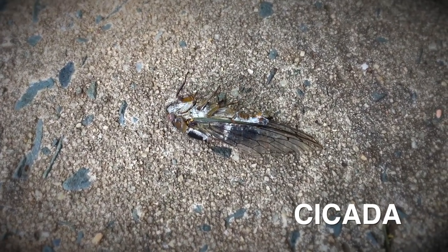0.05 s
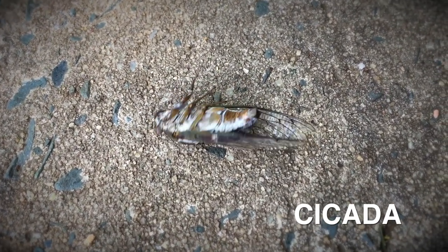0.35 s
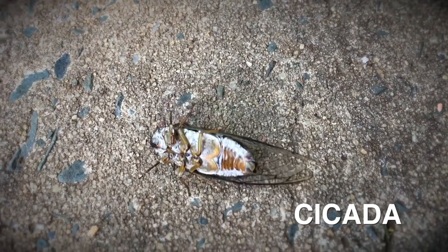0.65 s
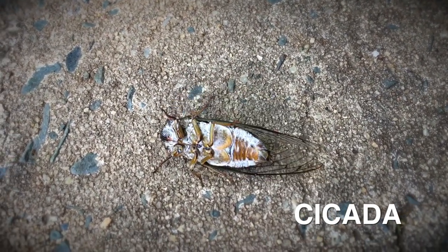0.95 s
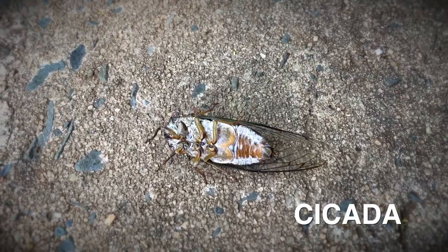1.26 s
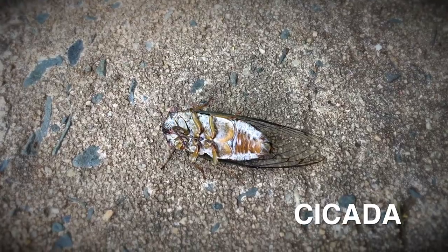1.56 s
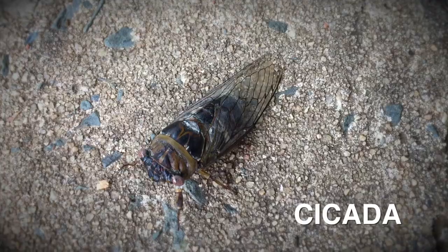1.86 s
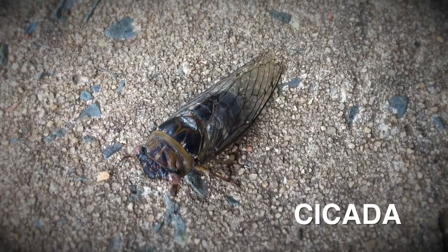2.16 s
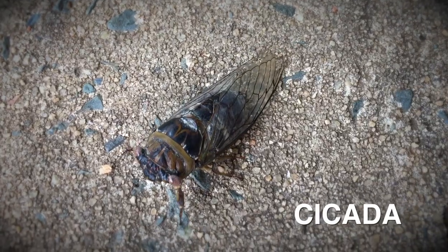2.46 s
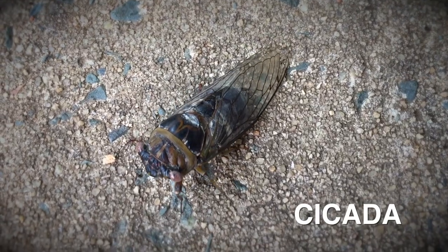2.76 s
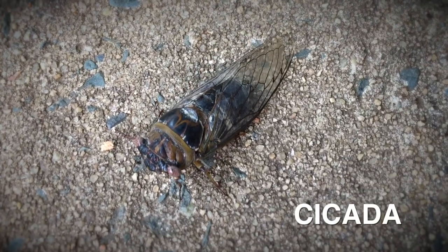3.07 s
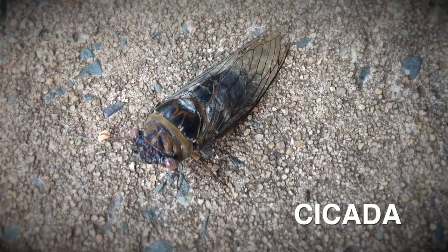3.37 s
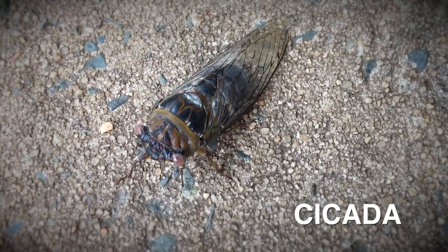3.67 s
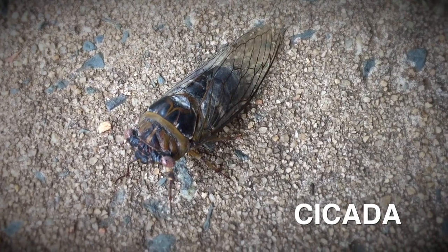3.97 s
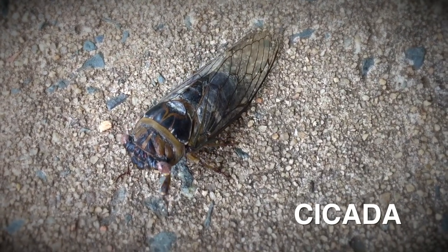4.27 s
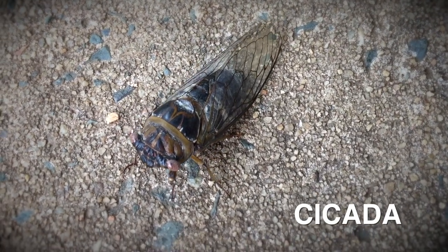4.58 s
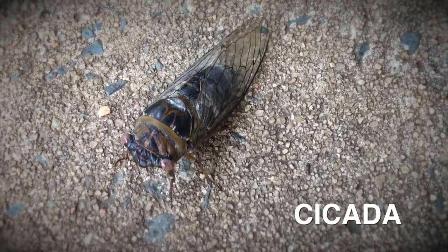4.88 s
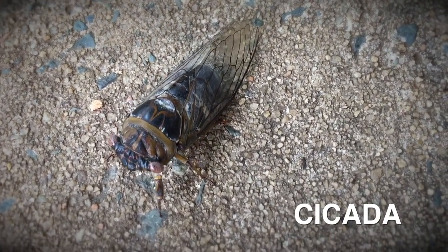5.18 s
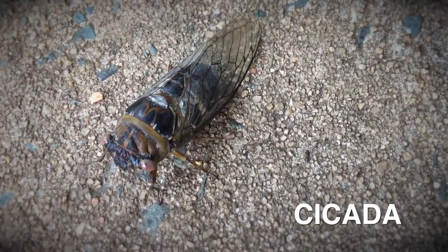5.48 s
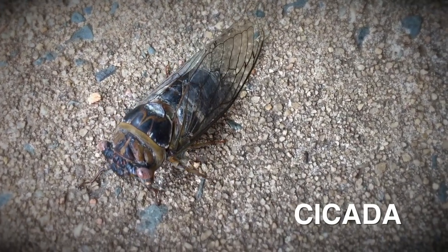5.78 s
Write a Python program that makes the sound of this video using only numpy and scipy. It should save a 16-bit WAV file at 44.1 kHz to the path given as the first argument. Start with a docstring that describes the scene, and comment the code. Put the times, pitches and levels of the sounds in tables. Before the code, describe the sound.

A cicada buzzes loudly on a concrete patio, close to the microphone, with a fast, shrill rattle that wavers and shifts tone as it rolls over. A distant engine hums faintly underneath and fades. After about two seconds the buzz stops abruptly. The rest is quiet: a few tiny claw ticks on the concrete over a far insect chorus, low rumble and soft outdoor hiss.

```python
"""On a concrete patio, a cicada buzzes up close, rolls from its side onto its back, tips back onto its side and
falls silent. Its two tymbals buckle in turn, three ribs a stroke, and each rib sets the hollow abdomen ringing.
Then its claws tick on the concrete. Behind it are a far insect chorus, low rumble and soft outdoor hiss; a
distant engine fades out early, and faint high whistles come and go near the end."""
import sys
import numpy as np
from scipy import signal
from scipy.fft import rfft, irfft, next_fast_len
from scipy.io import wavfile

SR = 44100
rng = np.random.default_rng(int(sys.argv[2]) if len(sys.argv) > 2 else 0)


def dump(signal):
    """Clip the signal to [-1, 1] and save it as 16-bit WAV at the path in sys.argv[1]."""
    limited = np.clip(np.atleast_2d(signal).T, -1, 1)
    pcm = np.round(limited * 32767).astype(np.int16)
    wavfile.write(sys.argv[1], SR, pcm)


N = 257103
T = np.arange(N) / SR

RISE_AT_S, RISE_S = 1.85, 0.12   # the background comes up as the buzz stops
CHORUS_FALL_DB_PER_S = 0.5


def cicada(roll_at_s=0.52, side_again_at_s=1.8, gain_db=-11.5, sway_db=0.66):
    """The buzz wavers with the insect's effort and changes colour as the body rolls onto its back and then back
    onto its side."""
    # Tone with one tymbal against the ground. Each row: centre in Hz, width in Hz, gain in dB.
    on_side = [(4350, 3600, -5), (5090, 280, -5.5), (6240, 760, 2.5), (9460, 1700, 6), (14000, 6100, -5)]
    # Tone while the body tips over. Each row: centre in Hz, width in Hz, gain in dB.
    tipping_colour = [(4550, 700, -4), (5030, 180, 14), (6200, 870, -6)]
    on_back = ramp(roll_at_s, 0.057) - ramp(side_again_at_s, 0.019)
    tipping = np.exp(-((T - 0.526) / 0.042) ** 2)   # a brief moment around the roll
    buzz = tymbal_buzz(on_back)
    buzz = (1 - tipping) * buzz + tipping * colour(buzz, tipping_colour)
    buzz = on_back * buzz + (1 - on_back) * colour(buzz, on_side)
    posture_db = 0.3 * on_back - 0.6 * tipping
    return from_db(gain_db + posture_db + sway_db * drift(7.4)) * buzz


def tymbal_buzz(on_back, snap_db=-18, shrill_db=-10, muffled_db=-10, fizz_db=-23, fizz_t60=0.035):
    """Two tymbals take turns ringing abdomen, shell and membrane; so small a body radiates no bass."""
    # Muscle pace. Each row: time in seconds, strokes per second of both tymbals together.
    beat = [(0.0, 103), (0.15, 109), (0.21, 98), (0.28, 101), (0.41, 119), (0.5, 99), (0.6, 101),
            (0.78, 89), (0.84, 93.3), (0.93, 84), (1.04, 94), (1.15, 100), (1.22, 89.7), (1.42, 104),
            (1.55, 91), (1.72, 107), (1.85, 88)]
    # One row per tymbal: when each of its three ribs buckles, in seconds into the stroke.
    rib_delays = [(0, .00242, .00493), (0, .0025, .00535)]
    # The ribs of each tymbal. Each row: pitch in Hz, ring length in seconds, then ring, snap and
    # shrill gains in dB.
    first_ribs = [(2307, 0.0023, 4, -1, -9.5), (2427, 0.00318, 7, 6, -19), (2555, 0.001, 8.5, 2, -5.5)]
    second_ribs = [(2547, 0.0026, 6.7, -5, -10), (2457, 0.003, 3.64, 2.5, -15),
                   (2660, 0.0015, 6.7, -3, -0.5)]
    # Modes of the shell and of the thin membrane. Each row: pitch in Hz, width in Hz, gain in dB.
    shell_modes = [(1306, 230, -9), (1507, 360, -8.5), (2940, 1200, -32), (4400, 1060, 6),
                   (4904, 210, -8.5), (5270, 117, -19), (7830, 730, -3.5)]
    membrane_modes = [(8745, 944, 7), (9740, 200, -10), (14600, 730, -33)]
    # Spectrum of the cuticle's fizz. Each row: frequency in Hz, relative level in dB.
    fizz_spectrum = [(4000, 8), (6500, -3), (9000, -3.5), (10500, -5), (12500, -0.5), (15500, -4.5)]
    # The body's narrow peaks and hollows. Each row: centre in Hz, width in Hz, gain in dB.
    body_colour = [(1080, 130, -10), (1530, 70, -6), (1660, 110, 3.5), (2440, 100, 2.5), (2680, 60, -1),
                   (2835, 100, 2.5), (2990, 100, -4), (3170, 170, 4.5), (3700, 120, -3), (3870, 100, 3),
                   (4010, 90, -3), (4265, 110, 3), (4740, 160, -3), (5280, 90, 2), (5480, 170, -4),
                   (6000, 300, -4), (8770, 170, 2), (15400, 700, -6)]
    strokes_per_s, = in_time(beat)
    hurry = 1 + 0.019 * drift(25)   # the muscles rush and lag at random
    cycles = np.cumsum(strokes_per_s / 2 * hurry) / SR
    offset_cycles = 0.53
    first_tone, first_snaps, first_kicks = tymbal(cycles - offset_cycles, rib_delays[0], first_ribs)
    second_tone, second_snaps, second_kicks = tymbal(cycles, rib_delays[1], second_ribs)
    shell = ring((first_snaps + second_snaps) * from_db(snap_db), shell_modes)
    # the tymbal that faces the ground loses its shrillness
    kicks = second_kicks + first_kicks * from_db(muffled_db * (1 - on_back))
    membrane = high_pass(ring(kicks * from_db(shrill_db), membrane_modes), hz=5800, order=2)
    # countless tiny modes of the cuticle smear every snap into a short fizz
    fizz_decay = from_db(fizz_db - 60 * T[:SR // 10] / fizz_t60)
    fizz = sum(signal.oaconvolve(snaps, fizz_decay * noise(fizz_spectrum)[:len(fizz_decay)])[:N]
               for snaps in (first_snaps, second_snaps))
    buzz = first_tone + second_tone + shell + membrane + fizz
    return high_pass(colour(buzz, body_colour), hz=1200, order=8)


def tymbal(cycles, delays, ribs, end_s=1.856, stroke_jitter_s=0.00055, rib_jitter_s=12e-6, uneven_db=0.7):
    """Each muscle pull buckles three ribs in a row, giving abdomen tone, snaps and membrane kicks."""
    pulls = np.interp(np.arange(100), cycles, T) + stroke_jitter_s * rng.standard_normal(100)
    pulls = pulls[pulls < end_s]
    tone, snaps, kicks = 0, 0, 0
    for delay, (hz, length, ring_db, snap_db, shrill_db) in zip(delays, ribs):
        late, force = rng.standard_normal((100, 2))[:len(pulls)].T
        buckles = clicks_at(pulls + delay + rib_jitter_s * late, from_db(uneven_db * force))
        tone = tone + from_db(ring_db) * signal.oaconvolve(buckles, abdomen(hz, length))[:N]
        snaps = snaps + from_db(snap_db) * buckles
        kicks = kicks + from_db(shrill_db) * buckles
    return tone, snaps, kicks


def abdomen(hz, length, damping=1.77):
    """The air sac's ring swells and dies within a few cycles as it trades energy with the tymbal."""
    t = np.arange(int(length * SR)) / SR
    return np.sin(2 * np.pi * hz * t) * np.sin(np.pi * t / length) * np.exp(-damping * t / length)


def claws(gain_db=-9, drag_s=0.009, bite_s=0.00038, slip_s=0.008, slip_db=-16, grit_db=4):
    """A claw drags over loose grains, bites, slips, catches again more weakly and scrapes on."""
    # Claws and wing catching on the concrete. Each row: time in seconds, relative level in dB,
    # seconds for the crackle to fall 60 dB, centre of its bright peak in Hz.
    ticks = [(1.888, -35.5, .012, 15000), (2.0158, -53, 0.017, 13000), (2.151, -46, 0.022, 14400),
             (2.732, -43, 0.016, 12500), (2.9118, -41.5, 0.0083, 9600), (2.9184, -49, .012, 11500),
             (2.9657, -48, .012, 12000), (2.9925, -39, .012, 13500), (3.4665, -56, .02, 13500),
             (3.535, -59, .012, 14000), (3.6531, -55, .015, 12000), (3.795, -59, .025, 10000),
             (4.3267, -34, 0.009, 13000), (4.592, -38, .012, 14000), (4.9212, -52, 0.014, 9500),
             (5.5044, -48, .01, 13000), (5.5248, -41.5, .012, 7000)]
    # Spectrum of the crackle. Each row: frequency in Hz, relative level in dB.
    crackle_spectrum = [(3000, -29), (6000, -12), (9000, -10.5), (12500, -4), (15500, -10)]
    softness = np.exp(-1 / (bite_s * SR))
    crackle = noise(crackle_spectrum)
    grit = from_db(grit_db * drift(400))
    out = shuffle() * crackle
    for at, db, t60, hz in ticks:
        drag = from_db(-23) * ramp(at - drag_s, drag_s)
        catch = dying(clicks_at(np.array([at, at + slip_s]), from_db([0, slip_db])), t60)
        scrape = dying(clicks_at(np.array([at]), from_db([-22])), t60=0.1)
        rub = np.where(T < at, drag, scrape) * grit
        force = signal.lfilter([1 - softness], [1, -softness], catch + rub)   # rounds the attack
        out = out + from_db(db) * colour(force * crackle, [(hz, 2000, 7.5)])
    return from_db(gain_db) * out


def shuffle(from_s=1.9, to_s=4.0, touches_per_s=3, gain_db=-64, spread_db=7):
    """The envelope of feet touching down lightly at random."""
    touches = (rng.random(N) < touches_per_s / SR) * (T > from_s) * (T < to_s)
    return dying(touches * from_db(gain_db + spread_db * rng.standard_normal(N)), t60=0.011)


def thin_high_ring(at_s=1.93):
    """A faint, thin, very high ring just after the buzz stops."""
    # The two ringing modes. Each row: pitch in Hz, width in Hz, gain in dB.
    modes = [(13930, 16, -72), (15350, 30, -73)]
    return ring(clicks_at(np.array([at_s]), [1]), modes)


def patio(x, scatter_db=-21, t60=0.05):
    """The ground and nearby things scatter a short, weak tail of dense reflections."""
    t = T[:SR // 8]
    tail = rng.standard_normal(len(t)) * from_db(-60 * t / t60)
    return x + from_db(scatter_db) * signal.oaconvolve(x, tail / np.linalg.norm(tail))[:N]


def engine(turns_per_s=37.7, start_db=-41.5, faint_db=-53, hold_s=0.68, fade_db_per_s=19.5):
    """A far engine drones on a few low orders, fades to a faint hum, then sinks away under the rumble."""
    # Engine orders. Each row: multiple of the turning rate, relative level in dB.
    orders = [(2, -1), (3, -5), (4, -1.5), (4.5, -14), (6, -16)]
    # Spectrum of the engine's noise. Each row: frequency in Hz, relative level in dB.
    roar_spectrum = [(30, 8), (70, -37), (200, 12), (300, -8), (600, -17), (1200, -9)]
    turns = np.cumsum(turns_per_s * (1 + 0.0077 * drift(2.48))) / SR
    drone = sum(from_db(db + 3 * drift(5.1)) * np.sin(2 * np.pi * (order * turns + rng.random()))
                for order, db in orders)
    roar = from_db(-11) * noise(roar_spectrum)
    level_db = np.maximum(start_db - fade_db_per_s * np.maximum(T - hold_s, 0), faint_db)
    return (rms_one(drone) + roar) * from_db(level_db) * (1 - ramp(start=1.73, length=0.38))


def surroundings(chorus_db=-49, rumble_db=-45, air_db=-60.5, rumble_fall_db_per_s=0.5):
    """Countless far insects merge into a sizzle over rumble and hiss; all sit lower during the buzz."""
    # Spectra of the three beds. Each row: frequency in Hz, relative level in dB.
    chorus_spectrum = [(1120, -54), (1900, -38), (1980, -28), (2110, -9), (2240, -5), (2600, -8.5),
                       (2790, 2), (2980, 0), (3280, -3.5), (3790, -6), (4850, -39.5), (5710, -34),
                       (6170, -48), (7850, -27.5), (9000, -73), (11700, -71), (19800, -120)]
    rumble_spectrum = [(13, -61.5), (22, -42), (41, -12), (65, 1), (91, -5.5), (119, -4), (141, -10),
                       (183, -10.5), (500, -41), (650, -78), (1100, -120)]
    air_spectrum = [(200, -1.5), (500, -7.5), (1000, 1), (1400, 0.5), (1900, -6), (4500, -16),
                    (9000, -26.5), (11000, -29), (16000, -27)]
    chorus = from_db(chorus_db - CHORUS_FALL_DB_PER_S * T + 0.6 * drift(28)) * noise(chorus_spectrum)
    rumble = from_db(rumble_db - rumble_fall_db_per_s * T + 0.9 * drift(7.8)) * noise(rumble_spectrum)
    air = from_db(air_db + 1.1 * drift(24)) * noise(air_spectrum)
    early = 1 - ramp(RISE_AT_S, RISE_S)
    return from_db(-3 * early) * (chorus + air) + from_db(-9 * early) * rumble


def singers():
    """Two warbling voices of the chorus, heard once the buzz stops."""
    # The two voices. Each row: pitch in Hz, level in dB before the slow fade.
    voices = [(2930, -59.5), (3040, -58)]
    song = sum(from_db(db - CHORUS_FALL_DB_PER_S * T) * wavering(hz, 70.46, rate=22, flutter_db=4.5)
               for hz, db in voices)
    return ramp(RISE_AT_S, RISE_S) * song


def whistles(hiss_db=-79):
    """Late on, thin, unsteady tones swell and fade over a faint high hiss."""
    # The whistles. Each row: start in seconds, length in seconds, pitch in Hz, level at the crest in dB.
    notes = [(3.65, 1.3, 5870, -76), (4.1, .7, 7050, -79), (4.3, 1.2, 6460, -83), (5.06, 0.13, 5500, -76),
             (5.2, 0.32, 6010, -76), (5.5, .6, 8570, -81), (5.58, .45, 6280, -79), (5.7, .12, 5500, -77)]
    # Spectrum of the hiss. Each row: frequency in Hz, relative level in dB.
    hiss_spectrum = [(4500, -22), (5800, -10), (8400, 0), (10000, -20)]
    out = from_db(hiss_db) * noise(hiss_spectrum) * ramp(start=3.3, length=0.64)
    for start, length, hz, db in notes:
        swell = from_db(db) * np.sin(np.pi * ramp(start, length))
        out = out + swell * wavering(hz, waver_hz=11.8, rate=20, flutter_db=2)
    return out


def wavering(hz, waver_hz, rate, flutter_db):
    """A tone of unit rms whose pitch and level wander."""
    turns = np.cumsum(hz + waver_hz * drift(rate)) / SR
    return rms_one(from_db(flutter_db * drift(rate)) * np.sin(2 * np.pi * turns))


def noise(spectrum):
    """Noise of unit rms, shaped by rows of Hz and dB."""
    hz, db = np.transpose(spectrum)
    size = next_fast_len(N)
    bins = np.maximum(np.fft.rfftfreq(size, 1 / SR), 1)
    gains = from_db(np.interp(np.log(bins), np.log(hz), db))
    return rms_one(irfft(rfft(rng.standard_normal(size)) * gains, size)[:N])


def drift(rate):
    """A random wander of spread 1 that changes about rate times a second."""
    size, points_per_s = 8192, 1024
    bins = np.fft.rfftfreq(size, 1 / points_per_s)
    slow = irfft(rfft(rng.standard_normal(size)) / (1 + (bins / rate) ** 2))
    return np.interp(T * points_per_s, np.arange(size), rms_one(slow))


def ring(clicks, modes):
    """Clicks set damped sines ringing, with signs alternating from mode to mode."""
    out = 0
    for k, (hz, width, db) in enumerate(modes):
        r, w = np.exp(-np.pi * width / SR), 2 * np.pi * hz / SR
        mode = signal.lfilter([np.sin(w), 0], [1, -2 * r * np.cos(w), r * r], clicks + 1e-18)
        out = out + (-1) ** k * from_db(db) * mode
    return out


def colour(x, peaks):
    """A chain of bell-shaped boosts and cuts."""
    for hz, width, db in peaks:
        w, g = 2 * np.pi * hz / SR, from_db(db / 2)
        a = np.sin(w) * width / (2 * hz)
        middle = -2 * np.cos(w)
        x = signal.lfilter([1 + a * g, middle, 1 - a * g], [1 + a / g, middle, 1 - a / g], x)
    return x


def high_pass(x, hz, order):
    """A low cut."""
    return signal.sosfilt(signal.butter(order, hz, "high", fs=SR, output="sos"), x)


def clicks_at(times, gains):
    """One impulse at each time."""
    return np.bincount(np.clip(np.round(times * SR).astype(int), 0, N - 1), gains, N)


def dying(clicks, t60):
    """An envelope that jumps at each click and dies away."""
    return signal.lfilter([1], [1, -from_db(-60 / (t60 * SR))], clicks + 1e-18)


def ramp(start, length):
    """A straight fade from 0 to 1."""
    return np.clip((T - start) / length, 0, 1)


def in_time(rows):
    """Each column of a timed curve at every sample."""
    s, *columns = np.transpose(rows)
    return [np.interp(T, s, c) for c in columns]


def from_db(db):
    """Decibels to gain."""
    return 10 ** (np.asarray(db) / 20)


def rms_one(x):
    """Scale to unit rms."""
    return x / np.sqrt(np.mean(x ** 2) + 1e-20)


def scene():
    """The near insect on its patio and everything far away, in mono."""
    near = patio(cicada() + claws() + thin_high_ring())
    return (near + engine() + surroundings() + singers() + whistles())[None]


def record(dry, cutoff_hz=15650):
    """The loudest peaks are rounded a little and the top is cut steeply."""
    return signal.sosfilt(signal.ellip(12, .1, 80, cutoff_hz, fs=SR, output="sos"), np.tanh(dry))


dry = scene()
out = record(dry)
dump(out)
```